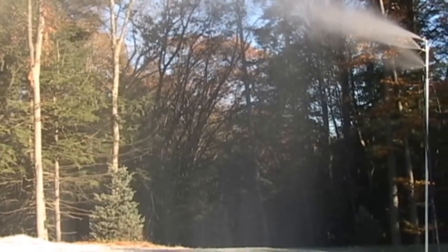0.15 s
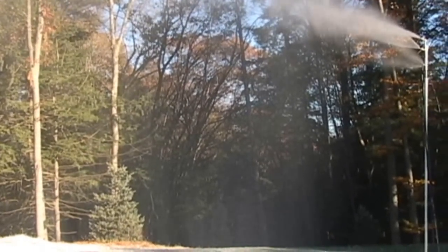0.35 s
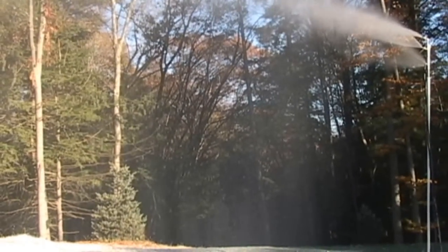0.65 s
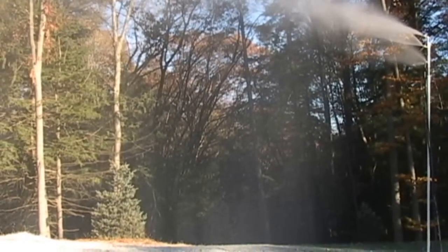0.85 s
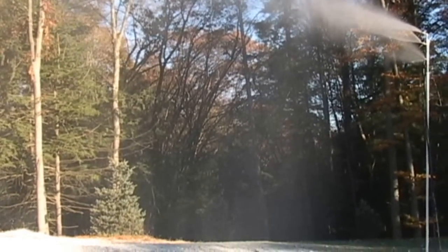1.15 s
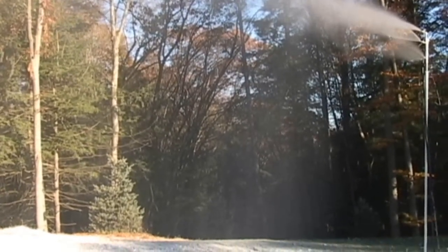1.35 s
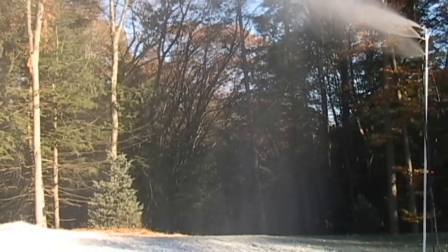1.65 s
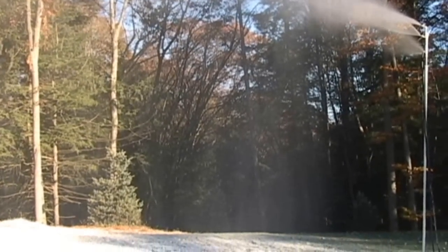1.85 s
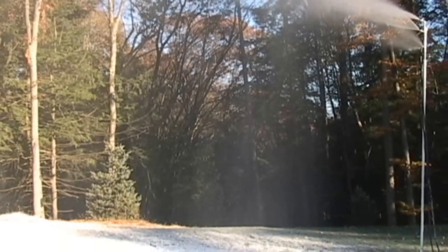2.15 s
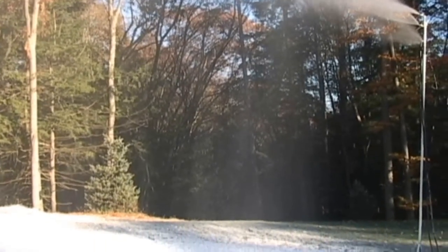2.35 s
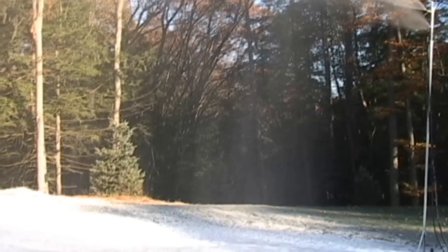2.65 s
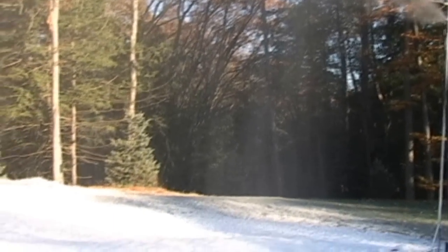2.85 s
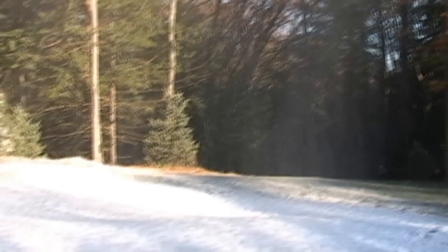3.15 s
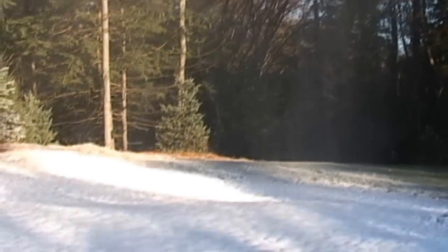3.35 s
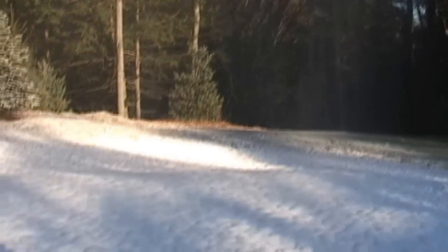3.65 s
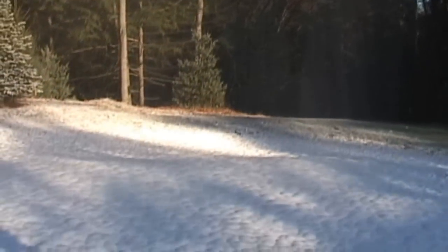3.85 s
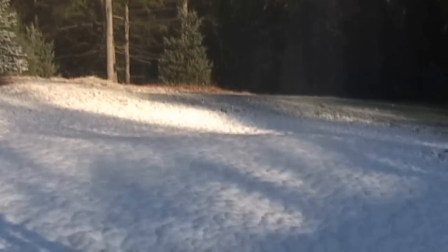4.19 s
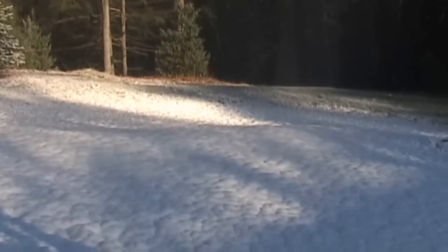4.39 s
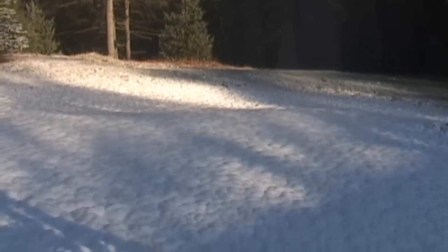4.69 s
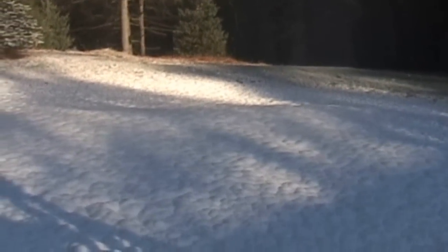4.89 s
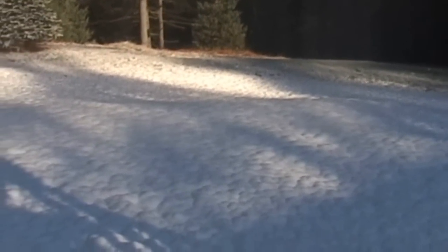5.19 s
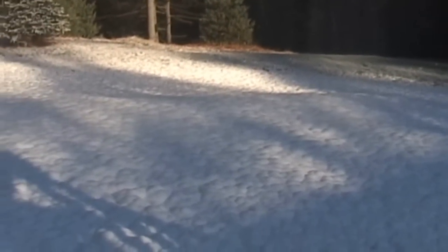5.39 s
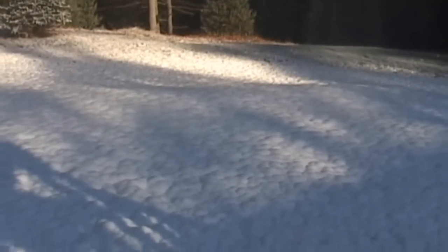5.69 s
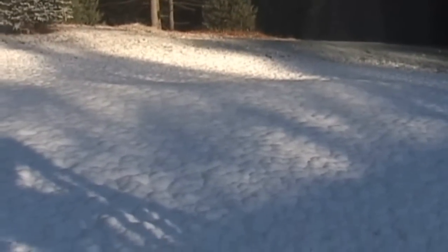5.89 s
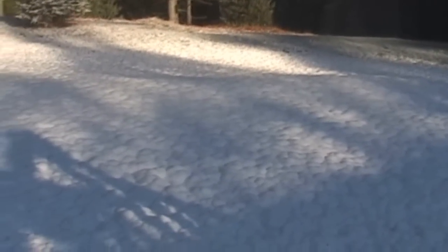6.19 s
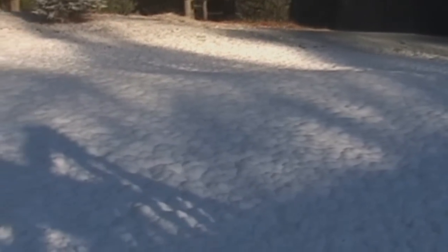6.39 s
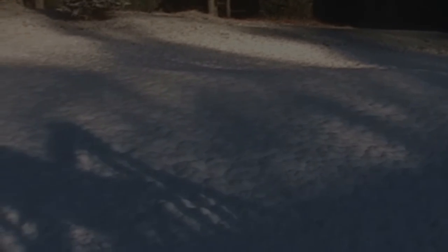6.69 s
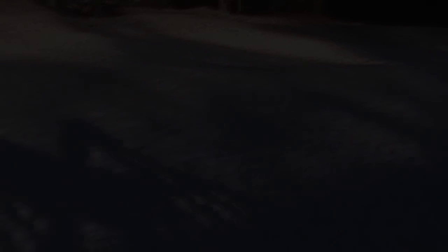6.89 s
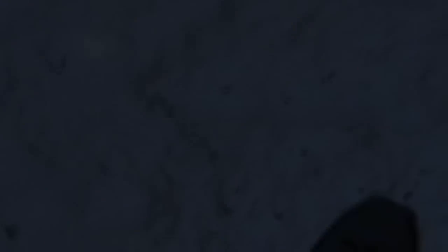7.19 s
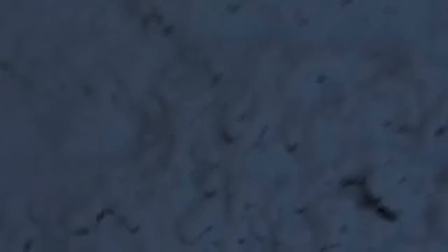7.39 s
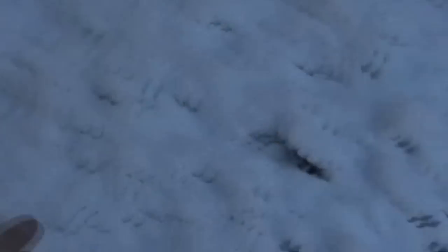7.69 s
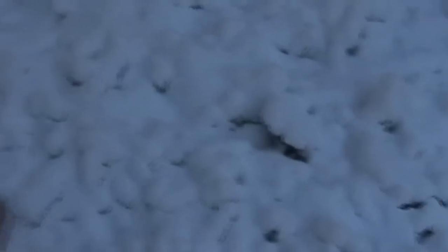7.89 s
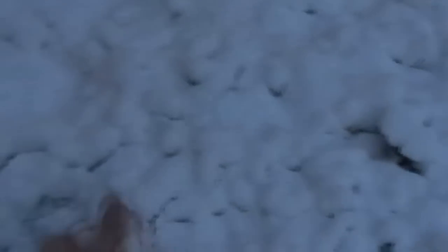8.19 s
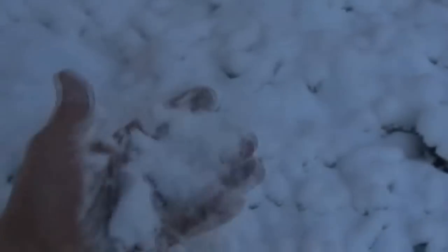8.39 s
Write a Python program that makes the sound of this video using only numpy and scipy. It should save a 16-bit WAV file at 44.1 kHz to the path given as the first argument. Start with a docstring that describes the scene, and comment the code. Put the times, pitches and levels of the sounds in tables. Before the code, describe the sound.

Steady bright hiss of a snowmaking gun, with a brief dull creaking boot step and a small tick of scooped snow late on.

```python
"""A steady, bright hiss comes first: a snow gun on a tall pole, with its compressor humming far off. The hiss
is shaped noise; the hum and a thin whine are sine waves. The hand-held microphone tilts from the nozzles down
to the snow; at 7.06 s the hiss changes abruptly to how it sounds close to the ground. There a boot settles with
a dull creaking crunch (short fading sine waves over crushed grains) and a hand scoops up icy snow with one
small tick. Three bright, rough strokes of dense clicks go with the crunch and the scooping."""
import sys
import numpy as np
from scipy import signal
from scipy.fft import rfft, irfft
from scipy.io import wavfile

SR = 44100
rng = np.random.default_rng(int(sys.argv[2]) if len(sys.argv) > 2 else 0)


def wav_record(signal):
    """Record a signal, one row per channel, as 16-bit PCM in the file named by sys.argv[1]."""
    frames = np.transpose(np.atleast_2d(signal))
    bounded = np.clip(frames, -1, 1)
    # unit amplitude maps onto the largest positive 16-bit level
    quanta = np.round(bounded * 32767).astype(np.int16)
    wavfile.write(sys.argv[1], SR, quanta)


N = 376613
TIME = np.arange(N) / SR
FRAME = 1024   # samples in one short-time spectrum
BIN_HZ = np.maximum(np.arange(FRAME // 2 + 1) * SR / FRAME, 1)[:, None]


def from_db(db):
    """Turn decibels into a plain gain."""
    return 10 ** (np.asarray(db) / 20)


def rms_one(x):
    """Scale to rms 1."""
    return x / np.sqrt(np.mean(x ** 2) + 1e-20)


def in_time(rows, t=TIME):
    """Read each column of a table at the times t, with straight lines between its rows."""
    times, *columns = np.transpose(rows)
    return [np.interp(t, times, column) for column in columns]


def at_hz(points, hz=BIN_HZ):
    """Read a spectrum with straight lines between its points on a log-frequency axis."""
    f, value = np.transpose(points)
    return np.interp(np.log(hz), np.log(f), value)


def drift(rate, t=TIME):
    """Smooth random wandering of rms 1 that changes about rate times a second."""
    step = 40   # samples between two drawn values
    pole = np.exp(-2 * np.pi * rate * step / SR)
    noise = rng.standard_normal(N // step + 3000)
    slow = signal.lfilter([1], [1, -2 * pole, pole * pole], noise)
    slow = slow[2000:]   # drop the filter's start-up
    return np.interp(t * SR / step, np.arange(len(slow)), rms_one(slow))


def short_spectra(x):
    """Frame times and short-time spectra."""
    return signal.stft(x, SR, nperseg=FRAME)[1:]


def coloured(x, spectrum):
    """Filter by a spectrum in dB, then scale to rms 1."""
    hz = np.maximum(np.arange(N // 2 + 1) * SR / N, 1)
    gain = from_db(at_hz(spectrum, hz))
    return rms_one(irfft(rfft(x) * gain, N))


def grains(per_s, spread_db):
    """Random clicks of uneven size and either sign, none far above the rest."""
    sizes = from_db(spread_db * np.minimum(rng.standard_normal(N), 2))
    signs = rng.choice([-1, 1], N)
    return (rng.random(N) < per_s / SR) * signs * sizes


def swell(start, length, rise_db_per_s, fall_db_per_s):
    """Gain that rises to 1 at the start, holds for the length in s, then dies away."""
    before = np.maximum(start - TIME, 0)
    after = np.maximum(TIME - start - length, 0)
    return from_db(-rise_db_per_s * before - fall_db_per_s * after)


# Thin electric whine: [f/Hz, rms level/dB]
WHINE_TONES = [(15218, -55), (15285, -52), (15368, -49), (15435, -56)]


def whine(wander=.8):
    """A cluster of faint tones at the top of hearing, made unsteady by wandering phase (radians)."""
    return sum(np.sqrt(2) * from_db(db) * np.sin(2 * np.pi * hz * TIME + wander * drift(6))
               for hz, db in WHINE_TONES)


# Speed of the compressor, before its small random wander: [t/s, strokes per s]
COMPRESSOR_SPEED = [(0, 23.5), (2.0, 23.5), (2.8, 23.1), (3.5, 23.35), (4.0, 23.8), (8.54, 23.7)]
# Its tones: [multiple of the stroke rate, rms level/dB before wavering]
COMPRESSOR_TONES = [(3,-62.5),(4.25,-56.5),(5,-56.5),(6,-53.5),(7,-55.5),(8,-57),(9,-59),(11,-61.5)]


def compressor(waver_db=2.5):
    """A distant piston machine gives low tones tied to its stroke rate; each wavers in level."""
    strokes_per_s = in_time(COMPRESSOR_SPEED)[0] * (1 + 0.0019 * drift(2.2))
    turns = np.cumsum(strokes_per_s) / SR
    hum = 0
    for multiple, db in COMPRESSOR_TONES:
        level = np.sqrt(2) * from_db(db + waver_db * drift(3.2))
        hum = hum + level * np.sin(2 * np.pi * (multiple * turns + rng.random()))
    return hum


def finger_touch(at_s=8.277, peak_db=-18, hz=1030, t60=.011):
    """The fingers break the crust with one small dry tick: a tone that falls 60 dB in t60 seconds."""
    age = np.maximum(TIME - at_s, 0)
    return from_db(peak_db - 60 * age / t60) * np.sin(2 * np.pi * hz * age)


# Three bright, rough strokes: one during the boot's crunch, two as the hand scoops the snow:
# [t/s, length/s, rms level/dB]
STROKES = [(7.6, .22, -29.5), (8.088, 0.05, -30), (8.252, .1, -27)]
# Tone colour of the strokes: [f/Hz, level/dB]
STROKE_SPECTRUM = [(1000,-20),(5500,-23),(7500,-1),(9000,0),(11000,-9),(15500,-18)]
STROKE_RISE_DB_PER_S, STROKE_FALL_DB_PER_S = 160, 100


def rough_strokes():
    """Dense bright clicks, drawn separately for each port, swell up and die away in each stroke."""
    strokes = sum(from_db(db) * swell(start, length, STROKE_RISE_DB_PER_S, STROKE_FALL_DB_PER_S)
                  for start, length, db in STROKES)
    clicks = [coloured(grains(per_s=4000, spread_db=8), STROKE_SPECTRUM) for port in range(2)]
    return strokes * np.array(clicks)


# The boot presses down: [t/s, length/s, peak level/dB before the boost in boot(), thud f/Hz]
BOOT_PRESSES = [(7.402, 0.02, -19.5, 340), (7.441, 0.015, -21, 550), (7.48, 0.058, -18.5, 397),
                (7.6, .03, -21, 300), (7.648, .058, -16.5, 286)]
SLIPS_PER_S, SLIP_JITTER_S = 96, 0.00099
SLIP_SPREAD_DB, SLIP_SPREAD_OCTAVES = 1.5, .25


def slips():
    """Stick and slip: each press gives a nearly even run of small jerks [t/s, level/dB, f/Hz]."""
    rows = []
    for start, length, db, hz in BOOT_PRESSES:
        chance = rng.standard_normal(size=(24, 3))
        ages = np.arange(0, length, 1 / SLIPS_PER_S)
        for age, (late, louder, higher) in zip(ages, chance):
            slip_s = start + age + SLIP_JITTER_S * late
            slip_hz = hz * 2 ** (SLIP_SPREAD_OCTAVES * higher)
            rows.append((slip_s, db + SLIP_SPREAD_DB * louder, slip_hz))
    return rows


# Single jerks as snow takes the weight: [t/s, peak level/dB before the boost in boot(), thud f/Hz]
WEIGHT_JERKS = [(7.386, -17, 221), (7.546, -13, 222), (7.711, -19, 270), (7.722, -15, 374),
                (7.75, -12.5, 282), (7.791, -14, 272), (7.842, -18, 432), (7.891, -17.5, 278)]
# Tone colour of the crushed grains: [f/Hz, level/dB]
CRUSH_SPECTRUM = [(50, -30), (160, -13), (400, 5), (600, -9), (950, -8), (1500, -17), (4000, -37)]
# Crushed grains: level against the listed level of the press, and how fast they come and go
CRUSH_DB, CRUSH_RISE_DB_PER_S, CRUSH_FALL_DB_PER_S = -16.5, 600, 450


def boot(cycles=4.35, crack_db=-4, slip_db=4, crack_hz=860, crack_t60=0.0053, low_cut_hz=150):
    """Snow packs in jerks: each is a quickly fading thud and a short muffled crack, over crushed grains."""
    load = sum(from_db(db) * swell(start, length, CRUSH_RISE_DB_PER_S, CRUSH_FALL_DB_PER_S)
               for start, length, db, hz in BOOT_PRESSES)
    out = from_db(CRUSH_DB) * load * coloured(grains(per_s=500, spread_db=3.0), CRUSH_SPECTRUM)
    t = TIME[:SR // 20]
    for start, db, hz in [*WEIGHT_JERKS, *slips()]:
        thud = np.sin(2 * np.pi * hz * t) * from_db(-60 * t * hz / cycles)   # 60 dB down after these cycles
        this_crack_hz = crack_hz * rng.uniform(0.71, 1.08)
        crack = np.sin(2 * np.pi * this_crack_hz * t) * from_db(-60 * t / crack_t60)
        jerk = from_db(db + slip_db) * (thud + from_db(crack_db) * crack)
        at = round(start * SR)
        out[at:at + len(t)] += jerk[:N - at]
    # so small a patch of snow radiates no deep bass
    return signal.sosfilt(signal.butter(3, low_cut_hz, "high", fs=SR, output="sos"), out)


def turbulence(t, flutter_db, flutter_rate, patch_db, patch_rate):
    """Eddies shake the whole treble together, and each stretch of the spectrum a little on its own (dB)."""
    centres = np.geomspace(500, 16000, 9)
    patches = sum(at_hz(np.c_[centres, row]) * drift(patch_rate, t) for row in np.eye(len(centres)))
    flutter = (BIN_HZ / 10000) * drift(flutter_rate, t)
    return flutter_db * flutter + patch_db * patches


def fine_ripple(t, depth_db=1.42, change_rate=0.24, count=20):
    """A fine random ripple over the spectrum of the hiss changes slowly (dB)."""
    spacings_s = rng.uniform(.002, .012, count)   # each ripple repeats every 1 / spacing Hz
    strengths = np.array([drift(change_rate, t) for spacing in spacings_s])
    ripples = np.cos(2 * np.pi * BIN_HZ * spacings_s) @ strengths
    return depth_db * rms_one(ripples) * np.minimum(BIN_HZ / 1000, 1)


def far_echo(low, echo_ms=3.79, ripple_db=2.0, from_hz=450, fade_hz=1300):
    """At standing height a later, dull echo adds a closer ripple to the low roar (dB)."""
    comb = np.cos(2 * np.pi * BIN_HZ * echo_ms / 1000)
    band = np.minimum(BIN_HZ / from_hz, 1) ** 2 * np.exp(-(BIN_HZ / fade_hz) ** 2)
    return (1 - low) * ripple_db * comb * band


# Resonances of the microphone housing: [f/Hz, width/Hz, level/dB]
HOUSING_RESONANCES = [(7160, 330, 1), (8100, 370, -1.5)]


def yard_colour(low, standing_echo_ms=1.94, ground_echo_ms=1.25, ripple_db=0.94, fade_hz=2200):
    """The echo off the snow ripples the middle of the spectrum; the housing colours the treble (dB)."""
    echo_ms = standing_echo_ms + low * (ground_echo_ms - standing_echo_ms)
    comb = np.cos(2 * np.pi * BIN_HZ * echo_ms / 1000)
    band = np.clip((BIN_HZ - 280) / 120, 0, 1) * np.exp(-(BIN_HZ / fade_hz) ** 2)
    housing = sum(db * np.exp(-((BIN_HZ - hz) / width) ** 2) for hz, width, db in HOUSING_RESONANCES)
    return ripple_db * comb * band + housing


# How fast each port's colour changes as the microphone swings round: [f/Hz, level change/dB per s]
LEFT_SWING = [(1500, 0), (3500, -0.7), (7000, -0.6), (11500, 1.5), (15500, 1.5)]
RIGHT_SWING = [(1500, 0), (3500, -0.2), (10000, -.7), (12500, .3)]
SWING_FROM_S = 5


def port_swing(t, low):
    """The microphone swings slowly round, so each port changes colour until it is near the ground (dB)."""
    swung_s = np.maximum(t - SWING_FROM_S, 0) * (1 - low)
    return swung_s * np.array([at_hz(LEFT_SWING), at_hz(RIGHT_SWING)])


# Tilt of the microphone: [t/s, turn away from the nozzles 0-1]
MICROPHONE_TILT = [(0, 0), (.6, .1), (2.4, 0.12), (3.1, 0.42), (3.7, 0.74), (4.5, 0.85)]
GROUND_FROM_S = 7.06
# Hiss pointing up, at the slope and near the ground, before ripples: [f/Hz, level/dB on unit white noise]
UP_HISS = [(25,-24),(100,-31),(200,-24),(380,-26),(550,-24.5),(2200,-20.5),(2800,-18),(4300,-16),(5100,-17.5),(6300,-15.5),(9800,-11.5),(11300,-14),(12400,-19.5),(15500,-22)]
SLOPE_HISS = [(25,-27),(100,-30.5),(200,-22),(380,-30),(550,-26),(2200,-21.5),(2800,-19),(4600,-16.5),(6100,-18),(7300,-13.5),(11000,-17),(13000,-21),(15500,-25)]
GROUND_HISS = [(25,-40),(90,-22.5),(170,-26),(300,-25),(620,-26.5),(1000,-23.5),(1300,-24.5),(1700,-19),(2250,-21),(3300,-18.5),(6000,-17.5),(9200,-14.5),(11000,-21.5),(15500,-26.5)]
# Shading by the microphone housing in these three poses: [f/Hz, left minus right level/dB]
UP_SHADE = [(100, -1.3), (2000, -1.3), (4800, -1.0), (5700, 2.4), (7000, -1.5), (9600, -4.5), (11000, 0),
            (13600, -0.5), (15500, -3)]
SLOPE_SHADE = [(100, -0.063), (2000, -1.4), (5200, -1.5), (6000, -1), (8000, 1), (9700, 1.7), (11000, -1.6),
               (13600, -0.84), (15500, 1)]
GROUND_SHADE = [(100, -1), (1900, -0.5), (2500, -3), (3300, -0.5), (7000, -1.2), (9300, -3.0),
                (11000, -1.5), (13600, -1.9), (15500, 0.0)]
# Power share of the hiss straight from the nozzles, not by way of the trees: [f/Hz, share 0-1]
STANDING_DIRECT = [(30,0.06),(70,0),(150,0.55),(400,0.33),(600,0.56),(2000,0.34),(2700,0.83),(3400,0.5),(4400,.65),(6000,0.44),(7400,0.68),(11500,0.81),(15500,0.6)]
GROUND_DIRECT = [(30,.15),(150,0.62),(500,0.19),(1200,0.2),(1650,0.65),(2200,.25),(2700,0.29),(3200,.3),(4500,.45),(7400,0.58),(9600,0.27),(15500,0.2)]
# Bending of sound round the housing, besides the lag: [f/Hz, phase by which left leads/radians]
STANDING_BEND = [(100, -0.083), (1800, -0.042), (3300, -0.088), (5400, 0.12), (6400, -0.51), (7600, -0.052),
                 (9000, -0.17), (10200, 0.097), (12700, 0.081), (15500, 0.8)]
GROUND_BEND = [(100,0),(900,.2),(1700,-0.49),(2200,-1.2),(2750,-1.1),(3050,-0.85),(4000,-1.9),(7500,-1.2),(11000,-.6),(14000,0)]
# Lag of the left port in the three poses
LAG_UP_MS, LAG_SLOPE_MS, LAG_GROUND_MS = 0.02, 0.048, .05


def snow_gun():
    """Jet noise reaches the two ports with a lag, mixed with its scatter from the trees."""
    t, (jet, *scatter) = short_spectra(rng.standard_normal((3, N)))
    turned = np.clip(in_time(MICROPHONE_TILT, t)[0], 0, 1)
    low = np.clip((t - GROUND_FROM_S) / .02 + .5, 0, 1)   # 0 standing, 1 close to the ground

    def blend(up, slope, ground):
        """Mix the values of three poses as the microphone moves."""
        return (1 - low) * ((1 - turned) * up + turned * slope) + low * ground

    def by_pose(up, slope, ground):
        """Blend three spectra."""
        return blend(at_hz(up), at_hz(slope), at_hz(ground))

    lag_ms = blend(LAG_UP_MS, LAG_SLOPE_MS, LAG_GROUND_MS)
    direct = np.clip(by_pose(STANDING_DIRECT, STANDING_DIRECT, GROUND_DIRECT), 0, 1)
    sides = np.array([.5, -.5])[:, None, None]   # half of each difference goes to left, half to right
    lead = by_pose(STANDING_BEND, STANDING_BEND, GROUND_BEND) - 2 * np.pi * BIN_HZ * lag_ms / 1000
    straight = np.sqrt(direct) * jet * np.exp(1j * sides * lead)
    ports = straight + np.sqrt(1 - direct) * np.array(scatter)

    level_db = by_pose(UP_HISS, SLOPE_HISS, GROUND_HISS)
    level_db = level_db + yard_colour(low) + far_echo(low) + fine_ripple(t)
    level_db = level_db + turbulence(t, flutter_db=0.51, flutter_rate=26, patch_db=0.71, patch_rate=24)
    shade_db = sides * by_pose(UP_SHADE, SLOPE_SHADE, GROUND_SHADE) + port_swing(t, low)
    return signal.istft(ports * from_db(level_db + shade_db), SR, nperseg=FRAME)[1][:, :N]


def scene():
    """Add the far machine and whine, the hand and boot in the snow, and the gun."""
    background = compressor() + np.array([whine(), whine()])
    in_the_snow = finger_touch() + rough_strokes() + boot()
    return background + in_the_snow + snow_gun()


def record(dry):
    """Cut the top steeply above 15700 Hz."""
    return signal.sosfiltfilt(signal.ellip(12, .05, 70, 15700, fs=SR, output="sos"), dry)


dry = scene()
out = record(dry)
wav_record(out)
```